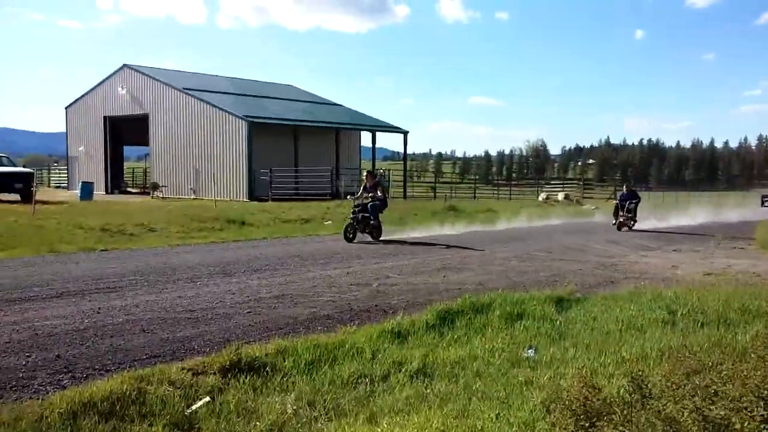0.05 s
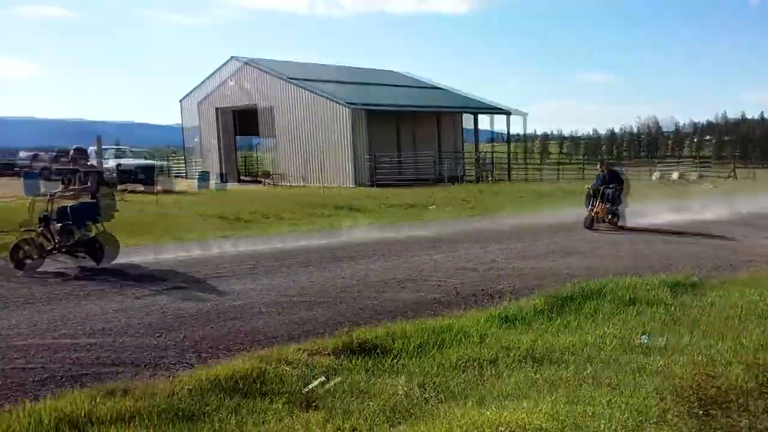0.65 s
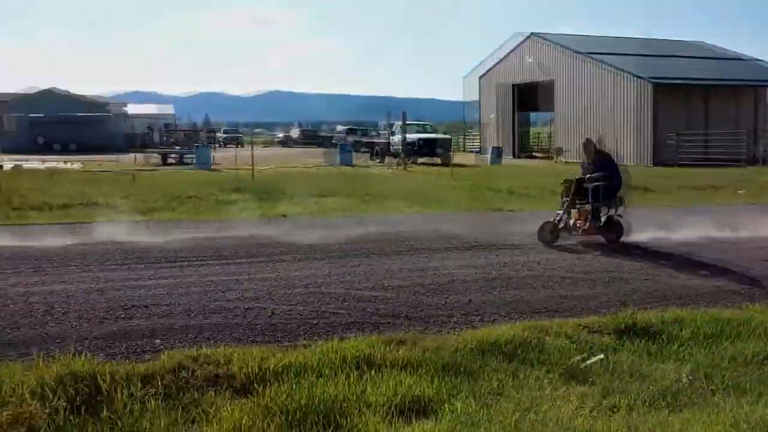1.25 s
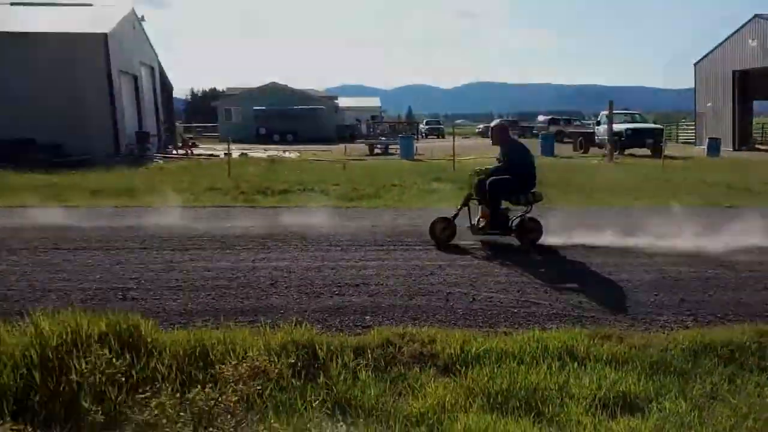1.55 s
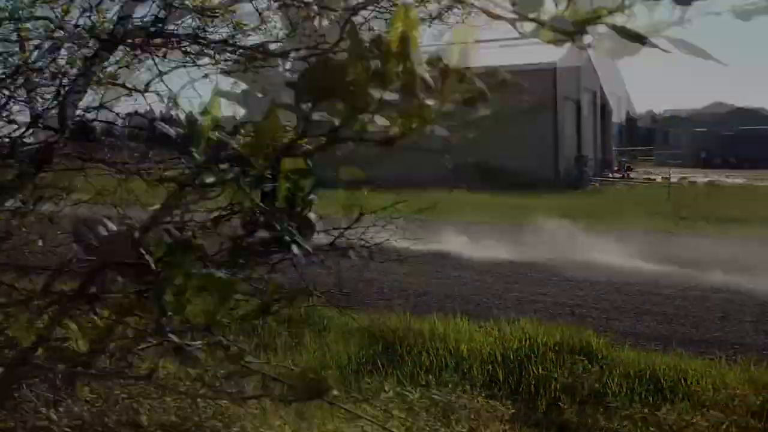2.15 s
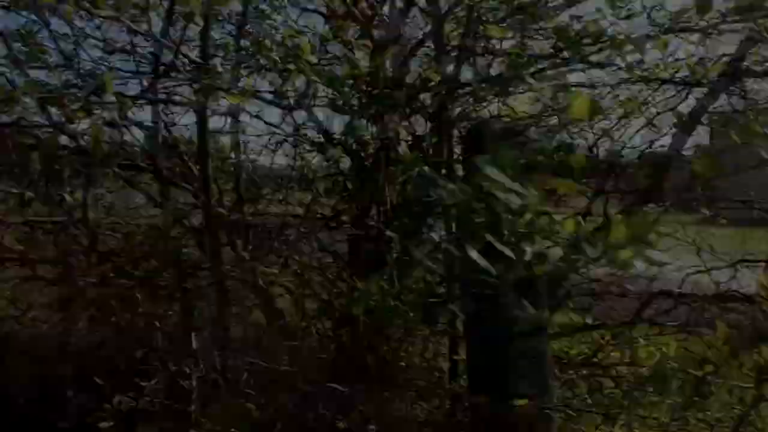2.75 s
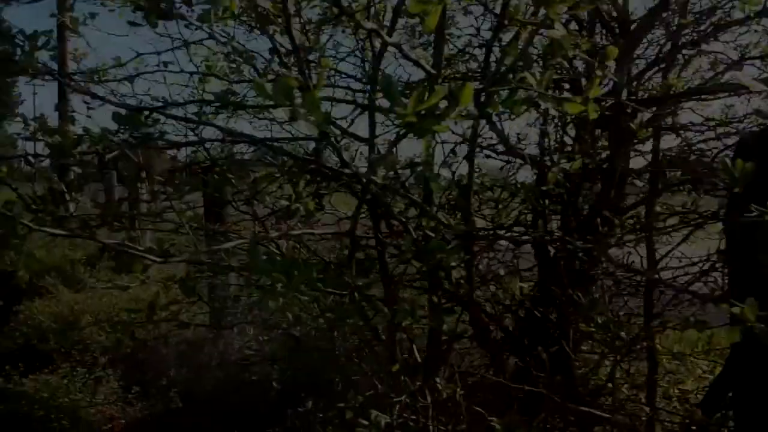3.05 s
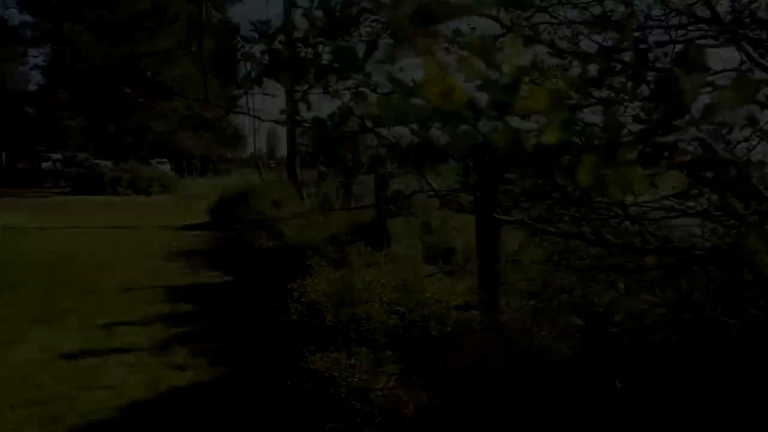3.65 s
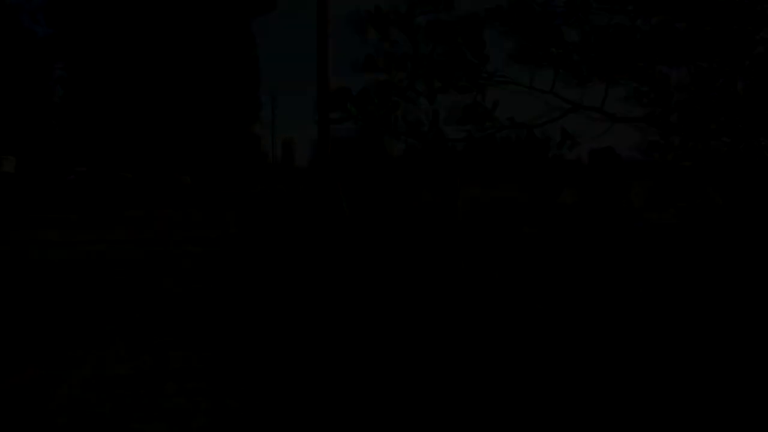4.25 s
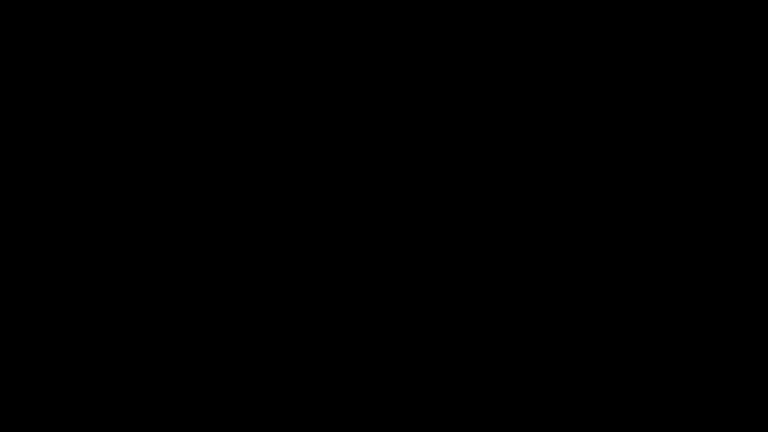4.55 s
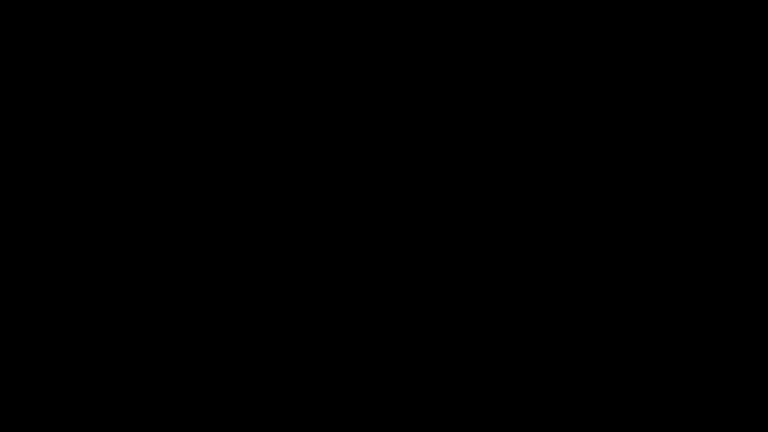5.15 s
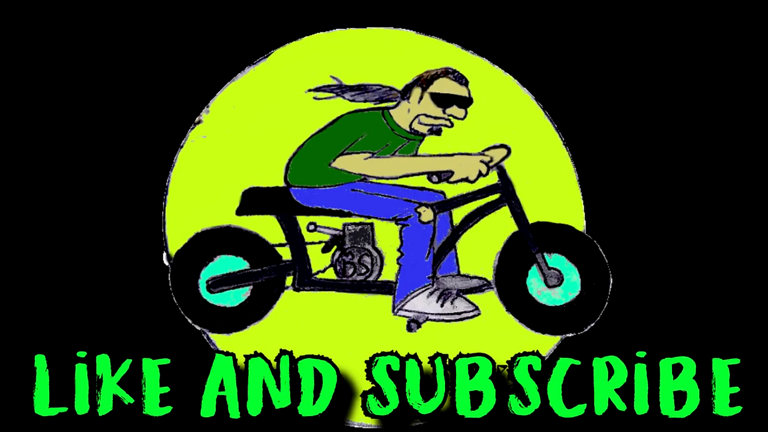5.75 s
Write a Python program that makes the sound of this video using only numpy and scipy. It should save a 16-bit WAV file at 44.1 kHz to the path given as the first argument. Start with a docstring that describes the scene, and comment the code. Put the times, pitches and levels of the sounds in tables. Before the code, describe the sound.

Two mini bikes buzz past on gravel; one shuts its throttle and coasts away popping, then metal clacks twice in a humming room.

```python
"""Two single-cylinder mini bikes ride past on a gravel road, one behind the other. Each engine firing
booms in the exhaust pipe, barks at its mouth and shakes the metal parts. The second bike passes close
at full throttle, shuts off and coasts away with a whirring chain and unburnt fuel popping in its
muffler. The ride fades out and the scene changes to a small humming room, where metal parts clack
together in two quick pairs."""
import sys
import numpy as np
from scipy import signal
from scipy.fft import rfft, irfft, next_fast_len
from scipy.io import wavfile
from scipy.ndimage import map_coordinates

SR = 44100
rng = np.random.default_rng(int(sys.argv[2]) if len(sys.argv) > 2 else 0)


def master_out(mix):
    """Clip the mix to full scale and print it as 16-bit PCM to the path in sys.argv[1]."""
    frames = np.transpose(np.atleast_2d(mix))
    ceiling = np.clip(frames, -1, 1)
    pcm = np.round(ceiling * 32767).astype(np.int16)
    wavfile.write(sys.argv[1], SR, pcm)


N = 260190
TIME = np.arange(N) / SR

# Tone of the room's ventilation, its hiss and the clacking metal: (frequency [Hz], gain [dB])
VENT_TONE = [(15, -41), (25, -2), (59, -17), (120, -4.5), (145, -12.5), (185, -2.5), (326, 0), (394, -6.5),
             (427, -9), (659, -8), (840, -10.5), (1440, -14.5), (2910, -15.5), (9320, -38), (16000, -49)]
HISS_TONE = [(300, -28), (800, 1.5), (2500, 1), (3500, -6), (4300, 4), (4900, -13), (7000, -16),
             (9300, -16.5), (15000, -26.5)]
METAL_TONE = [(410, -45.5), (700, -27.5), (1010, -16), (1500, -16), (2000, -6), (2880, -1), (3110, -7),
              (3690, 1.5), (4100, -3), (5990, -4), (7790, -9), (8880, -3.5), (9600, -11), (13100, -16),
              (16000, -23.5)]
# How loud the ventilation is: (time [s], level [dB])
VENT_LEVEL = [(5.225, -66), (5.37, -56.5), (5.41, -38.5), (5.6, -40.5), (5.9, -39)]
# Notes of the mains hum: (frequency [Hz], level [dB])
HUM_NOTES = [(120, -50), (241, -62)]
# Metal parts meeting: (time [s], relative strength [dB], ring of the housing [dB])
CLACKS = [(5.245, -33.5, -63), (5.4028, -29.5, -55), (5.4219, -7.5, -42), (5.453, -8.5, -25.5),
          (5.535, -37, -55), (5.65, -31, -60), (5.6841, -8, -45), (5.743, -11, -51), (5.8001, -33, -60),
          (5.82, -35, -60), (5.8586, -37, -60)]

# Loudness of the ride, through distance and fading: (time [s], relative level [dB])
RIDE_LEVEL = [(0.0, -27.5), (0.23, -26), (1.1, -22.5), (1.35, -20.5), (1.91, -20), (2.04, -19), (2.9, -31),
              (3.3, -38), (3.62, -42), (4.26, -59), (5.2, -69.5)]
# The leading bike's share of the firing sound: (time [s], share [dB])
LEADER_SHARE = [(0, -1), (.5, -1.86), (.9, -4), (1.6, -17), (2.8, -9.5), (3.4, -6)]
# Bike parts, one row for full throttle, one for coasting: (level when closest [dB], falloff [dB per dB])
TYRE_LEVELS = [(-41.5, 1.1), (-46, 1.07)]
CHAIN_LEVELS = [(-36.5, 0.22), (-35, 0.94)]
CLATTER_LEVELS = [(-26, 1.3), (-25.5, 1.008)]
BARK_LEVELS = [(-25, 0.91), (-25.5, 0.92)]
BOOM_LEVELS = [(-19, 1.17), (-24, 0.81)]
# The chain whirrs up in surges: (loudest at [s], length [s], boost [dB])
CHAIN_SURGES = [(1.1, 2.64, 9.5), (2.24, 0.87, 8.5), (2.965, 1.38, 7.5), (3.673, 0.78, 7.5),
                (4.495, 0.27, 6), (4.823, 0.24, 10)]
# Bands where reflected sound cancels direct sound:
# (deepest at [s], length [s], frequency then [Hz], glide [Hz/s], width [Hz], gain [dB])
CANCELLED_BANDS = [(1.4, 1.2, 1300, 0.5, 130, -3.5), (1.86, 0.77, 1640, -400, 270, -7.5),
                   (2.3, 2.5, 4050, 1, 120, -6), (2.7, 1.7, 2380, -200, 130, -7.5),
                   (2.8, 2.3, 2100, -150, 91, -12.5), (2.9, 1.2, 3520, -150, 230, -4.5),
                   (2.9, 1.9, 1650, 0, 150, -7.5), (2.72, 2.3, 510, -29.5, 58, -2.5),
                   (3.62, 1.2, 1270, 0, 73, -16), (2.25, 1, 8100, -100, 160, -7.5),
                   (2, 1, 5550, 1, 190, -11.5), (3.7, 0.48, 2580, 0, 270, -8)]
# Bike metal sings as it faces the listener:
# (middle [s], length [s], frequency then [Hz], glide [Hz/s], width [Hz], level if closest [dB])
METAL_RINGS = [(0.449, 3.15, 2810, -21, 480, -26.5), (1.2, 0.74, 2740, -31.5, 428, -25.5),
               (1.509, 1.24, 4380, 500, 303, -38), (1.684, 0.62, 2440, -450, 200, -36.5),
               (1.847, 0.78, 3740, 197.5, 276, -35), (2.1, 1.7, 3160, -130, 160, -27.5),
               (1.8, 1.12, 2030, -200, 201, -33), (2.028, 0.12, 1820, -900, 220, -28),
               (2.2, 0.68, 5190, -62, 150, -34.5), (2.246, .6, 4480, -200, 220, -28.5),
               (2.798, 1.9, 4344, -280, 280, -28.5), (2.98, 0.06, 1266, 0, 120, -25),
               (3.148, 1.1, 2730, -100, 230, -34.5), (2.95, .7, 3100, -200, 149, -45),
               (3.063, 0.26, 5730, 0, 300, -33), (3.748, 0.34, 5130, -900, 300, -29),
               (3.798, 1, 5920, 148, 160, -50), (3.754, 1.45, 3740, 98.5, 201.6, -31),
               (3.747, 0.87, 1040, 2, 110, -30), (4.112, 0.27, 2800, 0, 150, -27),
               (5.057, 0.4, 1510, -3, 259, -16.5), (5.048, 0.45, 3310, 0, 600, -20.5)]

# Tone of crunching gravel and of the rumble of tyres and air: (frequency [Hz], gain [dB])
GRAVEL_TONE = [(4120, -10.5), (7000, -8), (8150, -11.5), (10300, -13.5), (11800, -18.5), (15100, -20.5),
               (16000, -22.5)]
RUMBLE_TONE = [(20, -26.5), (42, -28.5), (63, 5), (110, 11), (300, -23), (900, -55)]
# Tone of the chain and of the engine's clatter: (frequency [Hz], gain [dB])
CHAIN_DRIVEN = [(2350, -2.5), (4000, -3), (4300, -1.5), (4690, -7), (5150, -7.5), (6470, -11.5),
                (8000, -22), (10400, -79), (17600, -120)]
CHAIN_COASTING = [(2400, -34), (4000, 4), (4450, -4.5), (5200, -3.5), (5800, -6), (6300, -10),
                  (7000, -25.5), (8000, -27.5), (10400, -49)]
CHAIN_FAR = [(2400, -30), (4000, -3.5), (5100, 2.5), (5600, -4.5), (6000, 0.5), (6450, -15), (7000, -16),
             (8000, -25), (10400, -94)]
CLATTER_DRIVEN = [(900, -21.5), (1600, 1), (1950, 6), (2400, 3), (3000, 5), (3700, 4), (4300, -2.5),
                  (5700, -43.5)]
CLATTER_COASTING = [(900, -26.5), (1550, 1), (1900, 5.5), (2400, 4), (3050, 4), (3800, 0), (4300, -2.5),
                    (5700, -36.5)]
# Tone of the exhaust pipe's mouth (bark) and of its inside (pipe): (frequency [Hz], gain [dB])
BARK_DRIVEN = [(300, -45), (440, -7), (520, -2), (600, -1), (690, 3.5), (780, 3.5), (920, 1.5),
               (1100, -4.5), (1350, -2.5), (1700, -12.5), (2400, -44)]
BARK_COASTING = [(380, -39), (510, -11.5), (610, -0.5), (750, -5), (900, 1), (1080, -10), (1300, -7),
                 (1700, -14), (2400, -48)]
PIPE_LEADER = [(30, -58), (60, -17), (85, -12.5), (125, -19), (170, 2.5), (210, -6.5), (250, 3.5), (295, 8),
               (335, 6), (380, -9.5), (450, -6), (700, -21.5), (1500, -70.5)]
PIPE_DRIVEN = [(30, -52), (45, -59.5), (64, -34), (85, -4.5), (128, -7.5), (170, 1), (213, 6.5), (255, 4),
               (297, 2.5), (345, -20.5), (425, -3), (480, -20.5), (700, -22.5), (1500, -76), (4000, -120)]
PIPE_COASTING = [(30, -56.5), (60, -33.5), (80, -12), (112, -5), (150, 3), (190, 1.5), (240, -12.5),
                 (290, -12), (340, -1.5), (420, -4), (470, -32), (620, -15.5), (1500, -70.5), (4000, -120)]
PIPE_FAR = [(30, -69), (60, -14), (90, -6), (130, -2.5), (190, -0.5), (290, 2), (360, -7.5), (470, -15.5),
            (700, -27), (1200, -50.5), (4000, -120)]
# Tone of a burble, of a pop and of the muffler's crack: (frequency [Hz], gain [dB])
BURBLE_TONE = [(30, -49), (70, -18), (120, 0.5), (190, 9), (270, -1.5), (370, -6.5), (490, -28), (680, -10),
               (900, -16.5), (1150, -24), (2600, -29), (5000, -60.5), (9000, -85)]
POP_TONE = [(30, -42.5), (70, -27.5), (120, -1), (190, 6.5), (280, 5), (380, 0.5), (480, -8.5), (700, -4.5),
            (1000, -7.5), (1400, -20), (2000, -21), (5000, -100)]
CRACK_TONE = [(200, -3.5), (620, 6), (950, 4), (1400, 1.5), (2000, 7.5), (2700, 8), (4500, 10.5),
              (5500, -1.5), (7000, -9.5), (15000, -30)]
# Notes at which the muffler's shell rings: (frequency [Hz], relative level [dB])
MUFFLER_NOTES = [(2520, -1.5), (2760, -2), (3380, -3.5), (3600, -1.5), (3790, -4.5), (4390, -7),
                 (4790, -2.5)]
# Stray firings of the fuel-starved engine: (time [s], peak level [dB])
BURBLES = [(2.162, -11), (2.243, -11), (3.372, -24), (3.708, -32), (3.775, -27.5), (3.965, -26.5),
           (4.024, -32.5), (4.19, -28.5), (4.353, -43), (4.455, -48), (4.524, -43.5), (4.59, -49),
           (4.66, -35.5), (4.703, -46), (4.762, -37), (4.796, -33.5), (4.828, -36), (4.933, -51),
           (5.038, -44), (5.072, -47.5), (5.106, -47.5)]
# Fuel exploding in the muffler:
# (time [s], thump [dB], thump's midrange gain [dB], crack [dB], ring [dB], ring centre [Hz], spread [Hz])
POPS = [(2.3209, -1, -14, -15.5, -14.5, 3400, 900), (3.291, -8, 1, -36, -15, 2980, 1100),
        (3.467, -9.5, 0, -41, -12, 3920, 650), (3.585, -13.5, -6, -44, -42, 2600, 900)]

# "Near" is the second bike. Rates are firings a second.
NEAR_FULL_RATE, NEAR_PASS_S, NEAR_SHUT_S = 42.3209, 1.7608, 2.045
LEAD_FULL_RATE, LEAD_PASS_S, LEAD_SHUT_S = 40.3, 1.05, 2.6
RATE_DROP, RUN_DOWN_PER_S, IDLE_RATE = 1.7693, 4.1755, 30.3139
MACH, PASSING_S = .0364, .4482  # road speed / speed of sound; closest distance / road speed
POP_DELAY_S = .001  # pops and burbles sound this long after their listed times
ROOM_START_S = 5.225


def amp(db):
    """Turn decibels into a multiplier."""
    return 10 ** (np.asarray(db) / 20)


def unit(x):
    """Scale x to an average (rms) strength of 1."""
    return x / np.sqrt(np.mean(x ** 2) + 1e-20)


def curve(rows):
    """Join (time, value) points with straight lines."""
    return np.interp(TIME, *np.transpose(rows))


def wobble(rate):
    """A smooth random curve through rate points a second."""
    return map_coordinates(rng.standard_normal(int(N * rate / SR) + 4), [TIME * rate])


def swell(peak_s, length):
    """A smooth rise and fall, 0 to 1 to 0."""
    return np.cos(np.pi * np.clip((TIME - peak_s) / length, -.5, .5)) ** 2


def blend(a, b, share):
    """Mix by power: share of a, the rest b."""
    share = np.clip(share, 0, 1)
    return np.sqrt(share) * a + np.sqrt(1 - share) * b


def colour(x, tone, sudden=1):
    """Pass x through a body with this tone; it starts suddenly (1) or as slowly as it dies (0)."""
    size = 2 * next_fast_len(len(x) // 2 + 8192)
    hz, db = np.transpose(tone)
    gain = amp(np.interp(np.log(np.fft.rfftfreq(size, 1 / SR) + 1), np.log(hz), db))
    # move the body's ringing from before each hit to after it
    cepstrum = irfft(np.log(np.maximum(gain, 1e-6)))
    cepstrum[1:size // 2] *= 1 + sudden
    cepstrum[size // 2 + 1:] *= 1 - sudden
    return irfft(rfft(x, size) * np.exp(rfft(cepstrum)), size)[:len(x)]


def voiced(x, tone):
    """Give x a tone, at strength 1."""
    return unit(colour(x, tone))


def grit(rate, spread_db):
    """Sharp random ticks of very unequal size, rate a second."""
    count = int(rate * N / SR)
    at, signs = rng.integers(0, N, count), rng.choice([-1, 1], count)
    sizes = amp(spread_db * np.minimum(rng.exponential(size=count), 4))
    return unit(np.bincount(at, signs * sizes, N))


def puffs(pulses, life_s, steady):
    """Rushing noise that flares after each pulse, over a steady share."""
    t = np.arange(SR // 20) / SR
    flare = unit(signal.fftconvolve(pulses, t * np.exp(-t / life_s))[:N])
    return blend(1, flare, steady) * rng.standard_normal(N)


def smear(pulses, life_s):
    """Echoes from muffler, frame and ground spread every pulse alike, so the pitch stays clear."""
    t = np.arange(SR // 20) / SR
    echoes = rfft(rng.standard_normal(len(t)) * np.exp(-t / life_s))
    spread = irfft(echoes / np.abs(echoes), len(t)) * np.cos(np.pi / 2 * t / t[-1])
    return unit(signal.fftconvolve(pulses, spread)[:N])


def room(hiss_db=-54):
    """Ventilation rush, mains hum and a thin steady hiss, in stereo."""
    vent_db = curve(VENT_LEVEL)
    mid, side = (voiced(rng.standard_normal(N), VENT_TONE) for _ in range(2))
    side = colour(side, [(100, -12), (1000, -12.5), (6000, -2)])
    vent = amp(vent_db) * np.array([mid + side, mid - side])
    hum = sum(amp(db + wobble(6)) * np.sqrt(2) * np.sin(2 * np.pi * hz * TIME) for hz, db in HUM_NOTES)
    hiss = amp(hiss_db) * voiced(rng.standard_normal(N), HISS_TONE)
    return hiss + vent + hum * amp(vent_db - vent_db.max())


def clacks(housing_hz=992, housing_ring_s=.044, chatter_s=.045, crackle_db=-51):
    """Metal parts scrape, meet with a snap and chatter briefly, with small crackles in between."""
    blows, housing = np.zeros(N), np.zeros(N)
    for s, db, housing_db in CLACKS:
        t = TIME - s
        fall_db = -60 * np.abs(t)  # divided below by the seconds it takes to die away
        housing += amp(housing_db + fall_db / housing_ring_s) * np.sin(2 * np.pi * housing_hz * t) * (t > 0)
        blows += amp(db - 10 + fall_db / np.where(t > 0, chatter_s, .0074))  # scrape, then chatter
        blows += amp(db - 22 + fall_db / .0071) * (t > 0)  # the snap
        blows += amp(db - 50 + fall_db / .27) * (t > 0)  # the room answers
    crackle = amp(crackle_db) * np.clip((TIME - 5.38) / .051, 0, 1)

    def metal():
        chatter = voiced(blend(grit(2500, spread_db=4), rng.standard_normal(N), .56), METAL_TONE)
        return blows * chatter + crackle * voiced(grit(100, spread_db=7), METAL_TONE)

    mid = metal()
    side = colour(metal(), [(1000, -18.5), (3000, -9), (6000, -3.5), (12000, -1.5)])
    return np.array([mid + side, mid - side]) + housing


def throttle_of(shut_s, closing_s=.025):
    """The throttle is wide open (1), then snaps shut (0)."""
    return 1 - np.clip((TIME - shut_s) / closing_s, 0, 1)


def doppler(pass_s):
    """Pitch multiplier: higher as a bike comes, lower as it leaves."""
    return 1 - MACH * (TIME - pass_s) / np.hypot(TIME - pass_s, PASSING_S)


def revs(full_rate, pass_s, shut_s):
    """Firings a second as heard: flat out, a quick drop, then running down to idle."""
    slowing = RATE_DROP * (1 - throttle_of(shut_s)) + RUN_DOWN_PER_S * np.maximum(TIME - shut_s, 0)
    return np.maximum(full_rate - slowing, IDLE_RATE) * doppler(pass_s)


def ride_db():
    """Loudness of the ride compared with the closest pass."""
    db = curve(RIDE_LEVEL)
    return db - np.interp(NEAR_PASS_S, TIME, db)


def part_db(levels):
    """Level of one bike part: set by the throttle, falling with distance."""
    driven, coasting = (db + falloff * ride_db() for db, falloff in levels)
    return coasting + (driven - coasting) * throttle_of(NEAR_SHUT_S)


def reflections(x):
    """Direct and reflected sound cancel in bands that slide as the bike goes by."""
    hz, t, spectrum = signal.stft(x, SR, nperseg=1024)
    gain_db = 0
    for s, length, centre, glide, width, db in CANCELLED_BANDS:
        band = np.exp(-((hz[:, None] - centre - glide * (t - s)) / width) ** 2)
        gain_db += db * np.interp(t, TIME, swell(s, length)) * band
    return signal.istft(spectrum * amp(gain_db), SR, nperseg=1024)[1][:N]


def tyres(pulses):
    """Tyres crunch over gravel; later, distance and a hedge dull the sound."""
    stones = blend(grit(1600, spread_db=2), puffs(pulses, life_s=.0016, steady=.95), .1)
    crunch = voiced(stones, GRAVEL_TONE)
    dull = voiced(crunch, [(7000, -2), (11000, -4), (16000, -22.5)])
    return amp(part_db(TYRE_LEVELS)) * blend(dull, crunch, (TIME - 2.2) / .36)


def link_ticks():
    """Chain links tick over a soft rush."""
    return blend(grit(1800, spread_db=3.2), rng.standard_normal(N), .69)


def meshing(x, likeness, links_per_firing=15.3):
    """Each link meets the toothed wheel much like the last, giving a faint pitch that follows speed."""
    gap = SR / (links_per_firing * revs(NEAR_FULL_RATE, NEAR_PASS_S, NEAR_SHUT_S))
    return unit(sum(likeness ** k * map_coordinates(x, [np.arange(N) - k * gap], order=1)
                    for k in range(4)))


def chain(throttle, far):
    """The chain whirrs in surges, first pulled tight, then slack."""
    whirr = meshing(link_ticks(), likeness=.1)
    slack = blend(voiced(whirr, CHAIN_FAR), voiced(whirr, CHAIN_COASTING), far)
    sound = blend(voiced(whirr, CHAIN_DRIVEN), slack, throttle)
    surge_db = sum(db * swell(s, length) for s, length, db in CHAIN_SURGES)
    return amp(part_db(CHAIN_LEVELS) + surge_db + .8 * wobble(14)) * sound


def ringing_metal(knock_share=.3):
    """Shaken and knocked guards and chain wheels ring in bands that swell, glide and die."""
    out = np.zeros(N)
    knocks = grit(160, spread_db=2.2)
    for peak_s, length, hz, glide, width, db in METAL_RINGS:
        on = np.abs(TIME - peak_s) < length / 2
        drive = blend(knocks[on], 1, knock_share) * rng.standard_normal((2, on.sum()))
        waver = signal.sosfilt(signal.butter(2, width / 2, fs=SR, output="sos"), drive)
        phase = 2 * np.pi * np.cumsum(hz + glide * (TIME[on] - peak_s)) / SR
        ring = unit(waver[0] * np.cos(phase) + waver[1] * np.sin(phase))
        out[on] += amp(db) * swell(peak_s, length)[on] * ring
    return amp(ride_db()) * out


def engine_clatter(near, both, leader_share, throttle):
    """Under load the engine clatters with each firing; coasting, it runs smoother."""
    rattle = puffs(near, life_s=.003, steady=.6 + .4 * leader_share)
    shake = blend(smear(both, life_s=.025), rattle, .3)
    driven = voiced(meshing(shake, likeness=.0099), CLATTER_DRIVEN)
    coasting = voiced(meshing(link_ticks(), likeness=.13), CLATTER_COASTING)
    return amp(part_db(CLATTER_LEVELS) + .7 * wobble(22)) * blend(driven, coasting, throttle)


def thump(tone):
    """One push of gas through the pipe, at peak 1."""
    kick = colour(signal.unit_impulse(SR // 10), tone)
    return kick / np.abs(kick).max()


def burbles():
    """Now and then the coasting engine catches: a soft, round thud from the pipe."""
    out, thud = np.zeros(N), thump(BURBLE_TONE)
    for s, db in BURBLES:
        out[round((s + POP_DELAY_S) * SR):][:len(thud)] += amp(db) * thud
    return out


def exhaust_pops(ring_s=.018):
    """Unburnt fuel goes off in the muffler: a thump, a crack and a short clank of its shell."""
    out, kick = np.zeros(N), thump(POP_TONE)
    t = np.arange(len(kick)) / SR
    for s, thump_db, mid_db, crack_db, ring_db, centre, spread in POPS:
        body = colour(kick, [(300, .0022), (550, mid_db)])
        burst = t / .0012 * np.exp(1 - t / .0018) * rng.standard_normal(len(t))
        crack = colour(burst, CRACK_TONE)
        notes = 0
        for hz, db in MUFFLER_NOTES:
            strength = amp(db) * np.exp(-((hz - centre) / spread) ** 2 / 2)
            notes += strength * np.sin(2 * np.pi * (hz * t + rng.random()))
        ring = notes * amp(-60 * t / ring_s) * (1 - np.exp(-t / .00089))
        pop = amp(thump_db) * body + amp(crack_db) * crack + amp(ring_db) * ring
        out[round((s + POP_DELAY_S) * SR):][:len(t)] += pop
    return out


def exhaust_bark(lead, near, both, leader_share, throttle, far, flare_s=.004):
    """The pipe's mouth barks: part pressure wave, part rushing gas."""
    wave = blend(smear(lead, life_s=.03), smear(near, life_s=.009), leader_share)
    gas = puffs(np.roll(both, -round(flare_s * SR)), life_s=flare_s, steady=.6)
    blast = blend(gas, wave, .1 + .32 * throttle + .5 * far)
    bark = blend(voiced(blast, BARK_DRIVEN), voiced(blast, BARK_COASTING), throttle)
    return amp(part_db(BARK_LEVELS) + .49 * wobble(14)) * bark


def valve_thumps(pulses, tone, lag_s=-.0007):
    """The exhaust valve opens gradually, so each thump swells and falls back."""
    return -unit(colour(np.roll(pulses, round(lag_s * SR)), tone, sudden=.2))


def exhaust_boom(lead, near, leader_share, throttle, far):
    """Each firing booms in the pipe, over a faint rumble of tyres and air."""
    coasting = blend(valve_thumps(near, PIPE_FAR), valve_thumps(near, PIPE_COASTING), (TIME - 3.5) / .7)
    # while the second bike is still far off, a barn's echoes blur its beat
    beat = blend(near, smear(near, life_s=.02), np.interp(TIME, [.6, 1.4], [.55, 1]))
    near_pipe = blend(valve_thumps(beat, PIPE_DRIVEN, lag_s=.0018), coasting, throttle)
    lead_pipe = voiced(smear(lead, life_s=.018), PIPE_LEADER)
    gas = voiced(puffs(near, life_s=.005, steady=.7), PIPE_LEADER)
    boom = blend(gas, blend(lead_pipe, near_pipe, leader_share), .015)
    rumble = amp(-26.5 + 10 * far) * voiced(rng.standard_normal(N), RUMBLE_TONE)
    # the pipe points backwards: less boom while the bike is still coming
    coming = np.clip((doppler(NEAR_PASS_S) - 1) / MACH, 0, 1)
    return amp(part_db(BOOM_LEVELS) - .5 * coming ** 2) * (boom + rumble)


def firings(rate, uneven_db, jitter_s):
    """One pulse per engine firing, each a little different in size and timing."""
    cycles = np.cumsum(rate) / SR + .61
    at = np.flatnonzero(np.diff(np.floor(cycles)))
    size_luck, time_luck = rng.standard_normal((len(at), 2)).T
    sizes = amp(np.broadcast_to(uneven_db, N)[at] * size_luck)
    nudged = np.clip(at + (jitter_s * SR * time_luck).astype(int), 0, N - 1)
    return unit(np.bincount(nudged, sizes, N))


def bikes():
    """The firings of two engines drive the boom, bark and clatter; chain and tyres run on."""
    throttle = throttle_of(NEAR_SHUT_S)
    leader_share = amp(curve(LEADER_SHARE)) ** 2
    far = np.clip((TIME - 3.1) / .55, 0, 1)
    uneven_db = .5 + .5 * (1 - throttle) + 1.8 * far  # a starved engine fires less evenly as it slows
    near = firings(revs(NEAR_FULL_RATE, NEAR_PASS_S, NEAR_SHUT_S), uneven_db, jitter_s=.00003)
    lead = firings(revs(LEAD_FULL_RATE, LEAD_PASS_S, LEAD_SHUT_S), uneven_db=3, jitter_s=.0003)
    both = blend(lead, near, leader_share)
    boom = exhaust_boom(lead, near, leader_share, throttle, far)
    bark = exhaust_bark(lead, near, both, leader_share, throttle, far)
    clatter = engine_clatter(near, both, leader_share, throttle)
    return boom + bark + clatter + chain(throttle, far) + tyres(both)


def scene(fade_s=.126, fade_db=-11):
    """The ride fades out, then the room takes over."""
    ride = reflections(bikes()) + ringing_metal() + exhaust_pops() + burbles()
    fade = amp(fade_db * np.clip(1 + (TIME - ROOM_START_S) / fade_s, 0, 1))
    indoors = np.clip((TIME - ROOM_START_S) / .0046, 0, 1)
    return (1 - indoors) * fade * ride + indoors * (room() + clacks())


def record(dry):
    """Round off the loudest peaks and remove the highest treble."""
    ceiling, hardness, top_hz = .95, 8, 15900
    rounded = dry / (1 + np.abs(dry / ceiling) ** hardness) ** (1 / hardness)
    size = next_fast_len(N + 8192)
    kept = np.fft.rfftfreq(size, 1 / SR) < top_hz
    return irfft(rfft(rounded, size) * kept, size)[..., :N]


dry = scene()
out = record(dry)
master_out(out)
```